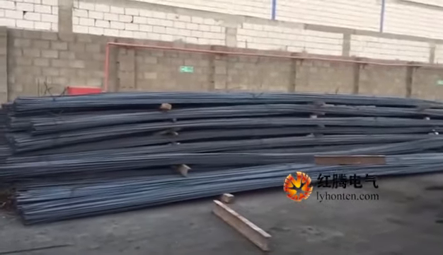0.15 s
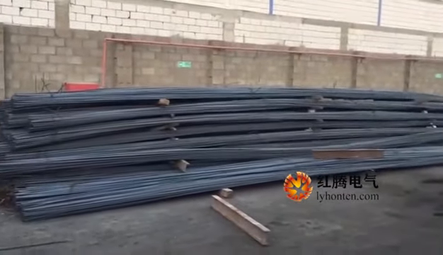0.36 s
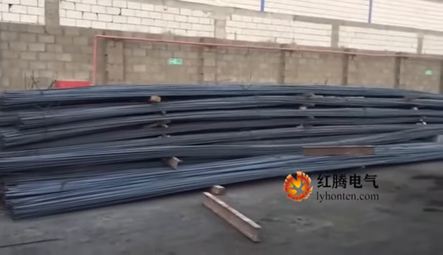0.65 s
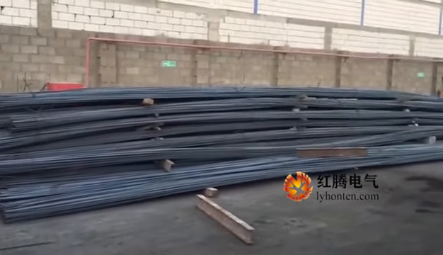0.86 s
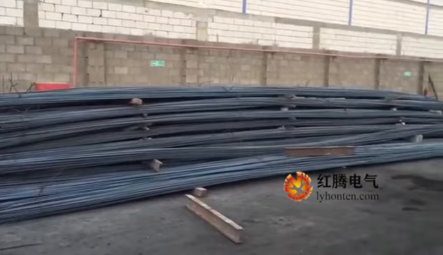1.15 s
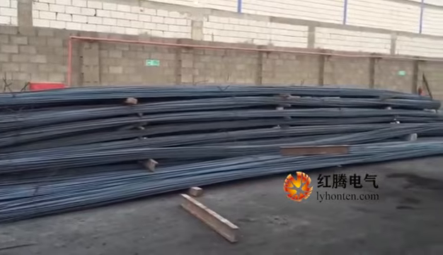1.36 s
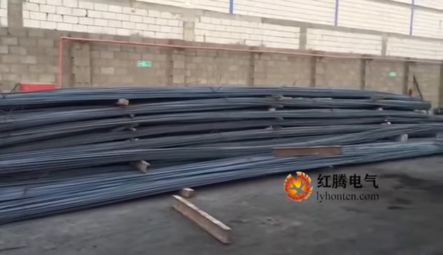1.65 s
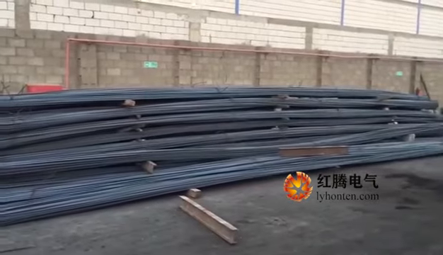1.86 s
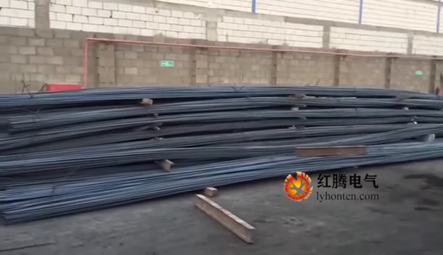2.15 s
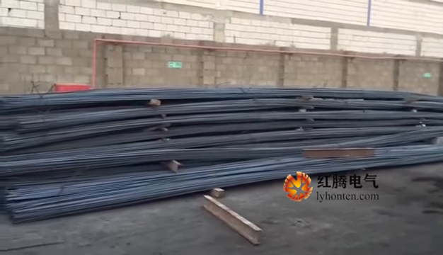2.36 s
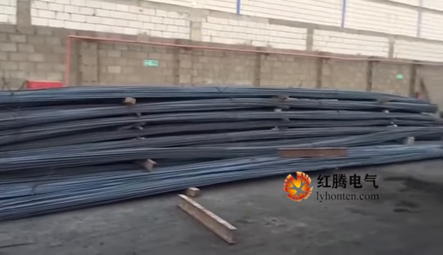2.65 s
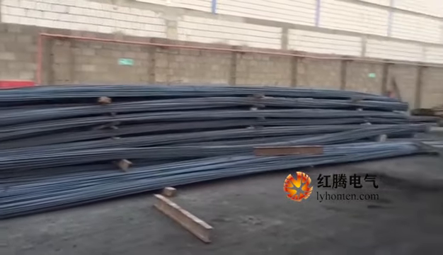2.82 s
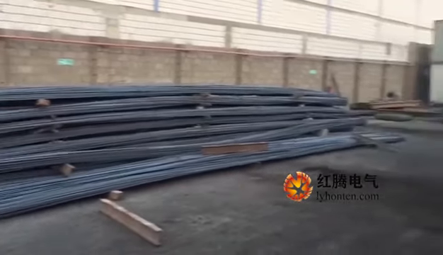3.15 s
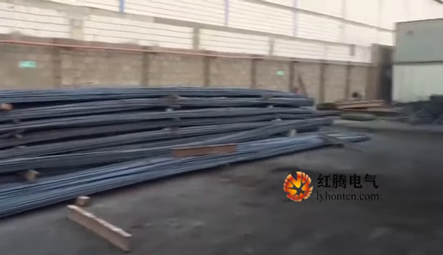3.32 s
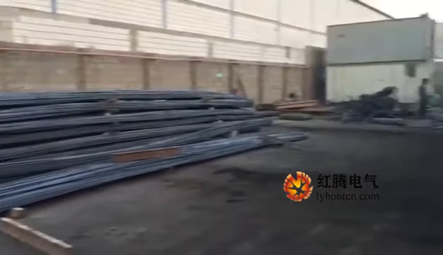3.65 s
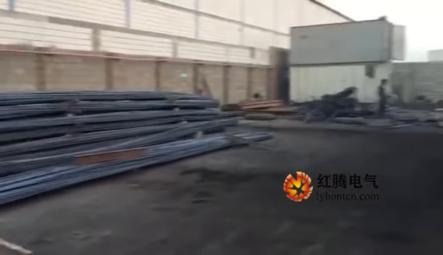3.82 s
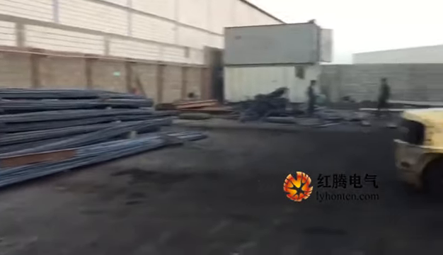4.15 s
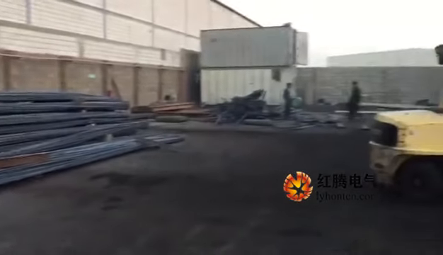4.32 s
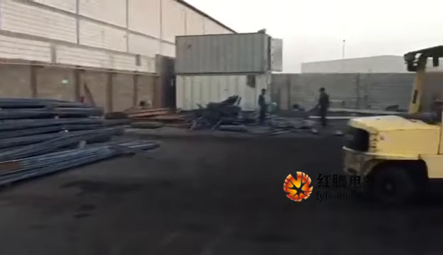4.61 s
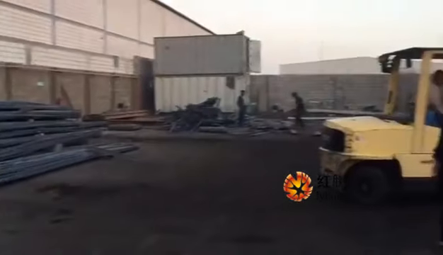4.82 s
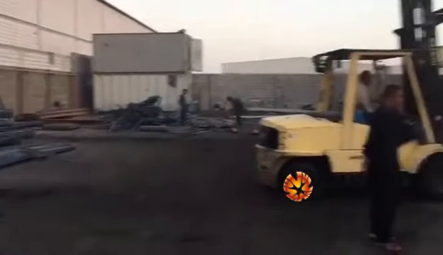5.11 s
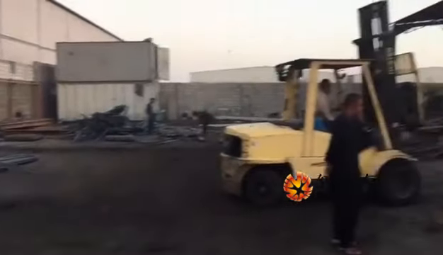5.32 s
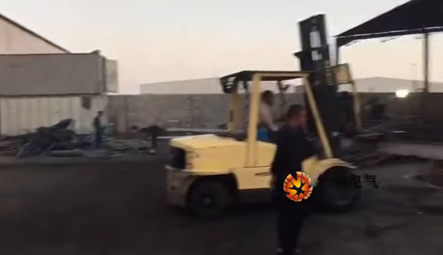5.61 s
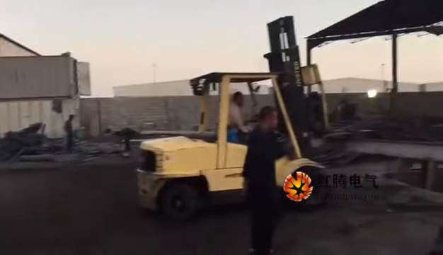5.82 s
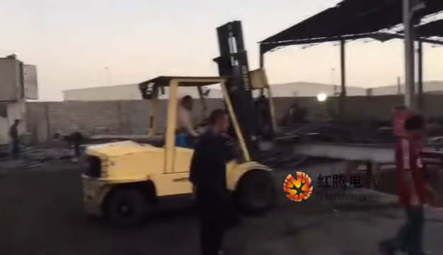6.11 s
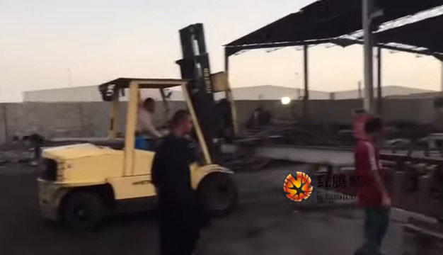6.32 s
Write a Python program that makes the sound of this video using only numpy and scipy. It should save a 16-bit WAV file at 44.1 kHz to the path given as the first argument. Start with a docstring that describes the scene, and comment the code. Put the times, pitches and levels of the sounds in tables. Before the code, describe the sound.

Loud lumpy diesel drone and rattling over distant mill rumble, with a single steel clank, a short hiss and a forklift engine swelling and easing.

```python
"""A heavy diesel idles in a steel yard with an uneven throb and a clatter that partly repeats every cycle:
six unequal exhaust puffs ring a pipe, and shaped noise makes the valve gear.
A forklift, harmonics of its firing rate through a silencer, revs up and eases off, with a noise whirr.
Steel clanks once in decaying tones and noise, with a sliding squeal and a short rush of hiss;
the mill behind gives a slowly growing rumble and a wash of noise, thin whines and faint distant sounds."""
import sys
import numpy as np
from scipy import signal
from scipy.fft import rfft, irfft
from scipy.io import wavfile

SR = 44100
rng = np.random.default_rng(int(sys.argv[2]) if len(sys.argv) > 2 else 0)


def bounce(signal):
    """Save signal as a 16-bit WAV file at the path given by the first command-line argument."""
    frames = np.transpose(np.atleast_2d(signal))
    limited = np.clip(frames, -1, 1)
    pcm = np.round(limited * 32767).astype(np.int16)
    wavfile.write(sys.argv[1], SR, pcm)


N = 285327
TIME = np.arange(N) / SR
FREQ = np.maximum(np.arange(N + 1) * SR / (2 * N), 1)  # Hz, for a spectrum padded to 2 N samples

# the microphone swings slowly towards the machines, still turning when the sound ends
TURN_START_S, TURN_S = 2.35, 6.05


def undb(db):
    """Decibels to gain."""
    return 10 ** (np.asarray(db) / 20)


def unit(x):
    """Scale to rms 1."""
    return x / np.sqrt(np.mean(x ** 2))


def filtered(x, response):
    """Apply a frequency response."""
    return irfft(rfft(x, 2 * N) * response)[:N]


def colour(x, points):
    """Shape a sound by (Hz, dB) points, joined along log frequency."""
    hz, db = np.transpose(points)
    return filtered(x, undb(np.interp(np.log(FREQ), np.log(hz), db)))


def resonance(hz, width):
    """Response of one resonance, gain 1 at its centre."""
    return 1 / (1 + 1j * (FREQ / hz - hz / FREQ) * hz / width)


def noise():
    """White noise."""
    return rng.standard_normal(N)


def walk(rate_hz):
    """Smooth random drift with spread 1."""
    return unit(filtered(noise(), np.exp(-(FREQ / rate_hz) ** 2)))


def sine(hz):
    """A sine of rms 1 that follows a changing pitch."""
    return np.sqrt(2) * np.sin(2 * np.pi * np.cumsum(hz) / SR)


def pulses(times, sizes):
    """Impulses at the given times."""
    inside = (times > 0) & (times < TIME[-1])
    return np.bincount((times[inside] * SR).astype(int), sizes[inside], N)


def ease(start, length):
    """A smooth move from 0 to 1."""
    return .5 - .5 * np.cos(np.pi * np.clip((TIME - start) / length, 0, 1))


def swell(start, attack, hold, release):
    """Attack, hold and release, between 0 and 1."""
    return ease(start, attack) - ease(start + attack + hold, release)


def machines_db(start_db=-24.5, turn_db=3.5):
    """Level of the machines, which grows as the microphone turns to face them."""
    return start_db + turn_db * ease(TURN_START_S, TURN_S)


# Broad wash of the distant mill. Each row: frequency in Hz, relative level in dB.
WASH_COLOUR = [(300, -21.5), (1000, -3.5), (2000, -3), (2800, -4), (3300, 1.5), (3750, -2.5), (4450, -4.5),
               (4950, -12), (5400, -5.5), (6300, -5.5), (7400, -12)]
# Thin whines of the distant mill. Each row: mean pitch in Hz, level in dB.
WHINES = [(429.5, -44), (630, -38), (992, -42.5), (2395, -49.5), (6358, -68.5)]


def mill(wash_db=-36.5, turn_db=0.2, flicker_db=0.88, drift_hz=2.48):
    """Distant machines: a wash of noise, slightly louder with the turn, and a few thin, drifting whines."""
    level_db = wash_db + turn_db * ease(TURN_START_S, TURN_S) + flicker_db * walk(27)
    wash = unit(colour(noise(), WASH_COLOUR)) * undb(level_db)
    whine = sum(undb(db) * sine(hz + drift_hz * walk(7.25)) for hz, db in WHINES)
    return wash + whine


# Low roar of the machinery. Each row: frequency in Hz, relative level in dB.
RUMBLE_COLOUR = [(15, -8.5), (30, -12), (48, 1.5), (62, 6.5), (90, 2), (140, 0), (200, 1.5), (270, -3.5),
                 (340, -11), (500, -25.5), (1500, -74)]


def rumble(below_clatter_db=-1.5):
    """A low roar of coloured noise from the machinery; it grows with the clatter."""
    return unit(colour(noise(), RUMBLE_COLOUR)) * undb(machines_db() + below_clatter_db)


# Faint sounds far from the microphone: a dull knock, a puff of noise and thin rings.
# Each row: time of the peak in seconds, centre in Hz, resonance width in Hz, level in dB, length in seconds.
DISTANT_SOUNDS = [(0.33, 650, 37, -23, 0.056), (.32, 1900, 350, -31, .12), (.37, 3250, 90, -40, .24),
                  (1.93, 329, 20, -28.5, .24), (2.44, 975, 40, -31, .06), (3.16, 4800, 293, -44, .04),
                  (4.392, 4830, 80, -38.5, 0.05), (4.39, 4480, 123, -39, .06), (4.95, 4500, 80, -45.5, .1),
                  (5.95, 4500, 55, -44, 0.43)]


def distant_sounds():
    """A dull knock, a puff of noise and thin rings, made of noise through resonances, swell softly."""
    out = np.zeros(N)
    for peak, hz, width, db, length in DISTANT_SOUNDS:
        sound = unit(filtered(noise(), resonance(hz, width) ** 2))
        out += sound * undb(db) * np.exp(-(2 * (TIME - peak) / length) ** 2)
    return out


# Hiss near the clank. Each row: frequency in Hz, relative level in dB.
HISS_COLOUR = [(150, -20), (330, -4.5), (900, 2.5), (1600, -5.5), (3200, -9), (5000, -13), (6500, -14.5),
               (7500, -18.5)]


def rush(start=1.65, attack=0.074, hold=.46, fall_db_per_s=19, level_db=-28, flutter_db=1.5):
    """A broad hiss of noise that rises with the clank, holds and dies away."""
    fading = np.maximum(TIME - start - attack - hold, 0)  # seconds since the hold ended
    db = level_db - fall_db_per_s * fading + flutter_db * walk(25)
    return unit(colour(noise(), HISS_COLOUR)) * ease(start, attack) * undb(db)


def squeal(start=1.66, length=.38, from_hz=1030, to_hz=595, level_db=-31, waver=0.012):
    """A faint, unsteady tone swells and slides down around the clank, like steel dragging."""
    progress = np.clip((TIME - start) / length, 0, 1)
    hz = from_hz * (to_hz / from_hz) ** progress * (1 + waver * walk(40))
    return sine(hz) * np.sin(np.pi * progress) * undb(level_db)


# Blows of the steel clank. Each row: start in seconds, crack gain in dB, ringing gain in dB.
CLANK_BLOWS = [(1.668, 7, 1.5), (1.673, -5, -15), (1.677, 2, -8), (1.681, -13, -22)]
# Ringing of the struck steel. Each row: pitch in Hz, relative level in dB, time to fall 60 dB in seconds.
STEEL_MODES = [(1020, -20, .07), (1560, -25, .06), (2164, -21.5, .06), (3150, -25, .04), (3450, -26, .03),
               (4000, -23, .06), (5200, -39, .1), (6355, -29, .2), (6410, -35, .17)]
# Crack of a blow and its tail. Each row: frequency in Hz, relative level in dB.
CRACK_COLOUR = [(200, -12), (500, -4), (1050, 0), (1300, -7), (1600, -.5), (2300, -3.5), (2800, -6),
                (3400, -5.5), (3900, -12), (4600, -19), (7500, -22)]


def clank(crack_db=-17.0, crack_t60=0.034, tail_db=-38, tail_t60=0.97):
    """Steel strikes steel and chatters; each blow feeds the same ringing and the walls answer."""
    out = np.zeros(N)
    crack = unit(colour(noise(), CRACK_COLOUR))
    tail = unit(colour(noise(), CRACK_COLOUR))
    tones = [np.sin(2 * np.pi * (hz * TIME + rng.random())) for hz, _, _ in STEEL_MODES]
    for start, blow_db, ring_db in CLANK_BLOWS:
        age = np.maximum(TIME - start, 0)
        ring = sum(tone * undb(db - 60 * age / t60) for tone, (_, db, t60) in zip(tones, STEEL_MODES))
        burst = crack * undb(crack_db - 60 * age / crack_t60)
        burst += tail * undb(tail_db - 60 * age / tail_t60)
        out += (TIME >= start) * (undb(ring_db) * ring + undb(blow_db) * burst)
    return out


FORKLIFT_IDLE_HZ, FORKLIFT_IDLE_DB = 37.97, -38  # firing rate, and level before its harmonics are weighted
# Presses of the forklift's throttle.
# Each row: start, rise, hold and release in seconds, firing rate reached in Hz.
THROTTLE_PRESSES = [(1.721, .78, .2, .44, 63.8), (3.217, .5, .45, 1.5, 47.5), (4.7, .3, 0.66, 0.31, 40.35)]


def revs(throttle_db=10, knee_hz=4.1, load_db_per_hz_s=0.095):
    """Firing rate and level: louder once the revs leave idle, and again while the engine pulls them up."""
    lifts = [(hz - FORKLIFT_IDLE_HZ) * swell(start, rise, hold, release)
             for start, rise, hold, release, hz in THROTTLE_PRESSES]
    lift = np.max(lifts, axis=0)
    pull = np.maximum(np.gradient(lift) * SR, 0)  # Hz per second
    level_db = FORKLIFT_IDLE_DB + throttle_db * np.tanh(lift / knee_hz) + load_db_per_hz_s * pull
    return FORKLIFT_IDLE_HZ + lift, level_db


# Whirr of the forklift. Each row: frequency in Hz, relative level in dB.
WHIRR_COLOUR = [(150, -11.5), (290, 2.5), (480, -0.5), (850, -3.5), (1400, -7), (3500, -22), (7400, -37)]


def whirr(whirr_db=-39, db_per_hz=1.3, top_db=8, early_db=-12):
    """Fan and gears grow with the revs; the whirr comes forward, 12 dB louder, between 3.2 and 4.1 s."""
    hz, _ = revs()
    effort_db = np.minimum(db_per_hz * (hz - FORKLIFT_IDLE_HZ), top_db)
    held_back = 1 - ease(3.18, 0.91)
    return unit(colour(noise(), WHIRR_COLOUR)) * undb(whirr_db + effort_db + early_db * held_back)


# Harmonics of the forklift, from the firing rate up. Each entry: relative level in dB.
FORKLIFT_HARMONICS = [-1, -3.5, -8.5, -3, -12, -8, -11, -11.5]
# The forklift's silencer. Each row: frequency in Hz, gain in dB.
SILENCER_GAIN = [(25, -28), (38, -3.5), (47, -0.5), (58, 10.5), (64, 5.5), (80, -1), (120, -2.5), (190, 1),
                 (240, -10.5), (500, -16.5)]


def forklift(rough_db=0.7):
    """Harmonics of the firing rate through the silencer, which booms as they pass its resonance."""
    hz, level_db = revs()
    phase = 2 * np.pi * np.cumsum(hz) / SR
    pipe_hz, pipe_db = np.transpose(SILENCER_GAIN)
    out = np.zeros(N)
    for k, harmonic_db in enumerate(FORKLIFT_HARMONICS, 1):
        db = harmonic_db + np.interp(np.log(k * hz), np.log(pipe_hz), pipe_db)
        out += undb(db) * np.sin(k * phase + 2 * np.pi * rng.random())
    return np.sqrt(2) * out * undb(level_db + rough_db * walk(8))


# Clatter of the idling diesel. Each row: frequency in Hz, relative level in dB.
RATTLE_COLOUR = [(170, -36), (290, -3), (410, -4.5), (526, -3), (645, -1), (760, -3), (950, -9.5),
                 (1400, -9), (1930, -9.5), (2790, -16.5), (4080, -22), (5060, -28.5), (7400, -40.5)]


def clatter(cycle, repeat_hz=1400, repeat_share=0.35, knock_db=0.53, flicker_db=0.93):
    """Valve gear rattles partly alike in every cycle; towards the treble the rattle turns random."""
    size = int(SR * TIME[-1] / cycle[-1])  # samples in an average cycle
    one_cycle = irfft(np.exp(2j * np.pi * rng.random(size // 2 + 1)), size)
    repeating = unit(np.interp(cycle % 1 * size, np.arange(size), one_cycle))
    share = np.clip(repeat_share, 0, 1) / (1 + (FREQ / repeat_hz) ** 2)  # share of power that repeats
    rattle = filtered(repeating, np.sqrt(share)) + filtered(noise(), np.sqrt(1 - share))
    # the knock swells once a crank turn, twice a four-stroke cycle
    knock = knock_db * np.cos(2 * np.pi * 2 * cycle)
    return unit(colour(rattle, RATTLE_COLOUR)) * undb(machines_db() + knock + flicker_db * walk(25))


# When each cylinder's puff leaves the pipe. Each entry: place as a share of a cycle.
PUFF_PLACES = [.05, .247, .405, .579, .714, .895]
# Strength of each cylinder's puff. Each entry: relative level in dB.
PUFF_LEVELS = [-5, -1.5, -10.5, 2.5, -3, -1]
# Exhaust pipe resonances. Each row: frequency in Hz, width in Hz, relative level in dB.
PIPE_MODES = [(86.35, 13.06, -1), (114.65, 9.8, -2), (159.4, 7.8, -15), (210.4, 29.8, -10),
              (255.7, 6.4, -20)]


def exhaust(cycle, level_db=-14, turn_db=-0.5, scatter_db=0.95, jitter_s=.00015, outlet_hz=60, low_cut_hz=55):
    """Six unequal puffs a cycle ring the pipe, so the diesel throbs."""
    places = (np.arange(int(cycle[-1]) + 1)[:, None] + PUFF_PLACES).ravel()
    chance = rng.standard_normal((len(places), 2))
    times = np.interp(places, cycle, TIME, right=2 * TIME[-1]) + jitter_s * chance[:, 0]
    sizes = undb(np.resize(PUFF_LEVELS, len(places)) + scatter_db * chance[:, 1])
    # neighbouring pipe modes swing in opposite directions at the outlet
    pipe = sum((-1) ** (k + 1) * undb(db) * resonance(hz, width)
               for k, (hz, width, db) in enumerate(PIPE_MODES))
    # the small outlet radiates long waves poorly
    outlet = 1 / np.sqrt(1 + (outlet_hz / FREQ) ** 4) / (1 + (low_cut_hz / FREQ) ** 4)
    throb = unit(filtered(pulses(times, sizes), pipe * outlet))
    return throb * undb(level_db + turn_db * ease(TURN_START_S, TURN_S))


# Late change of the drone's colour. Each row: frequency in Hz, change in dB.
THINNER_COLOUR = [(80, -3.5), (120, -3), (160, 5), (210, 0), (300, 1)]


def thinned(drone):
    """Late on, the drone loses some bass and gains low mids."""
    return drone + ease(5.61, 0.51) * (colour(drone, THINNER_COLOUR) - drone)


def scene():
    """Both engines, the mill and the steel, in mono."""
    # four-stroke cycles per second; the idle creeps up slightly late on
    cycle_hz = 13.4 + .045 * ease(3.6, 2.4)
    cycle = np.cumsum(cycle_hz) / SR
    drone = thinned(exhaust(cycle) + rumble())
    steel = clank() + squeal()
    background = mill() + distant_sounds()
    return (background + steel + rush() + whirr() + forklift() + clatter(cycle) + drone)[None]


def record(dry, ceiling=.85, top_hz=7470):
    """The recorder rounds the highest peaks and cuts off the treble steeply."""
    rounded = dry / (1 + (dry / ceiling) ** 6) ** (1 / 6)
    return signal.sosfilt(signal.ellip(12, .1, 90, top_hz, fs=SR, output="sos"), rounded)


dry = scene()
out = record(dry)
bounce(out)
```